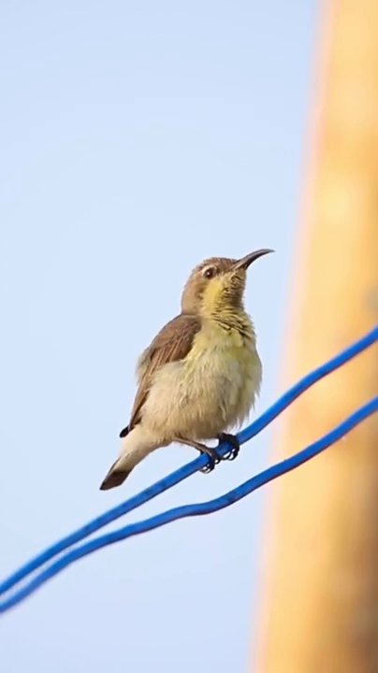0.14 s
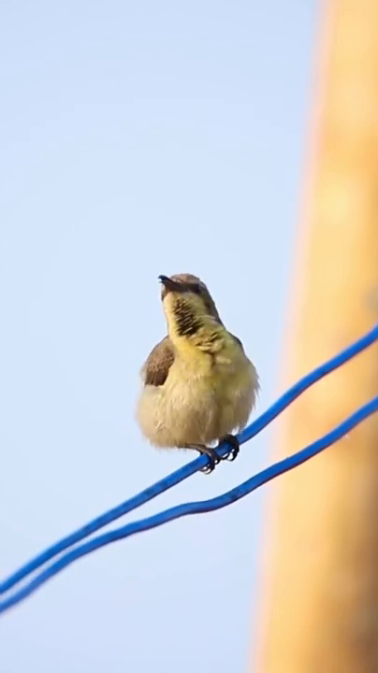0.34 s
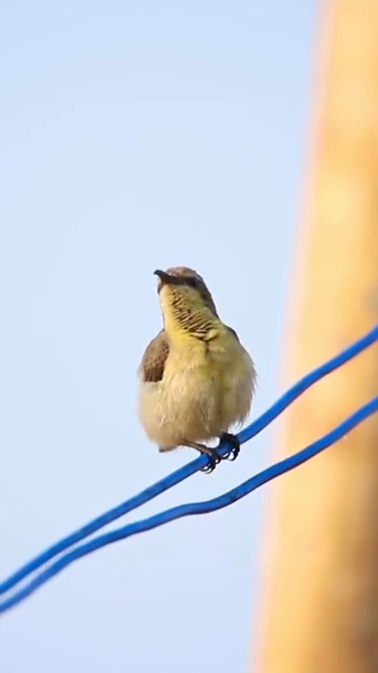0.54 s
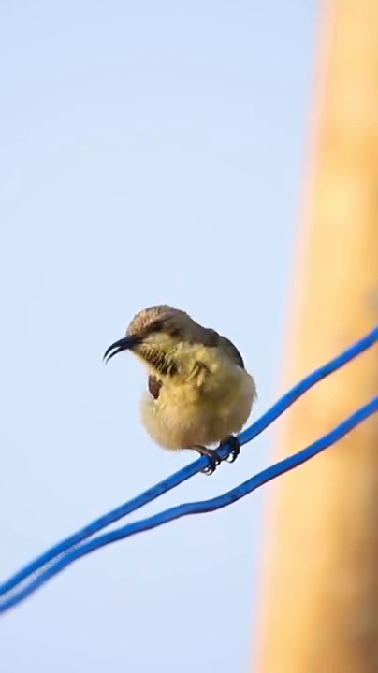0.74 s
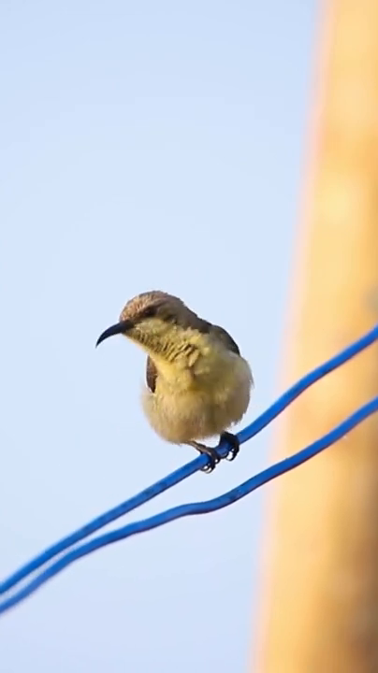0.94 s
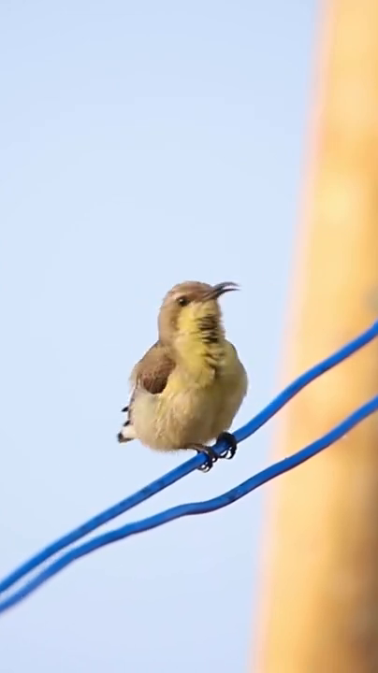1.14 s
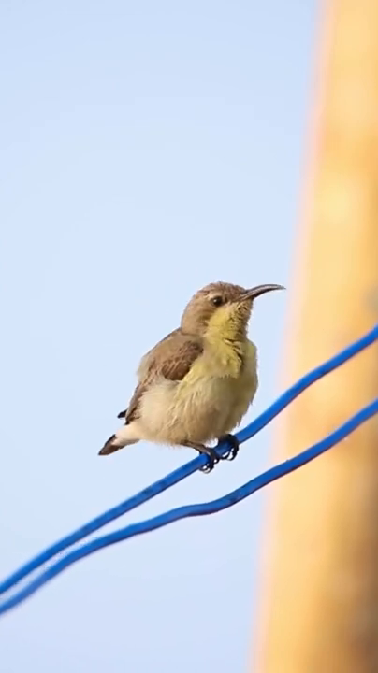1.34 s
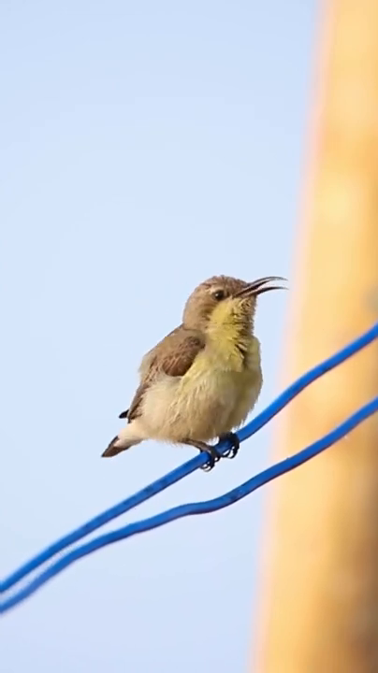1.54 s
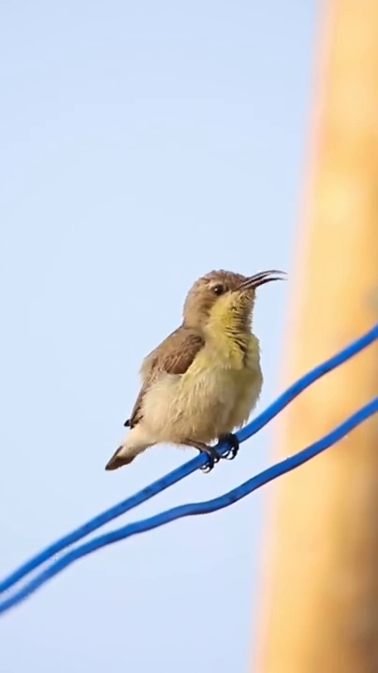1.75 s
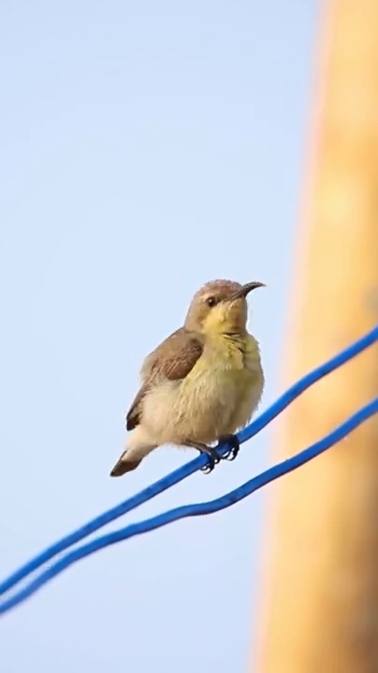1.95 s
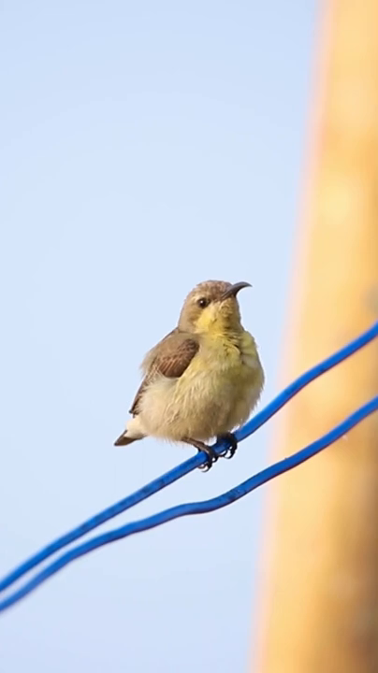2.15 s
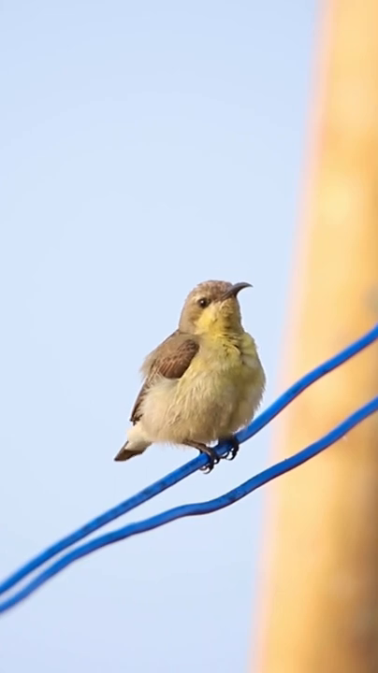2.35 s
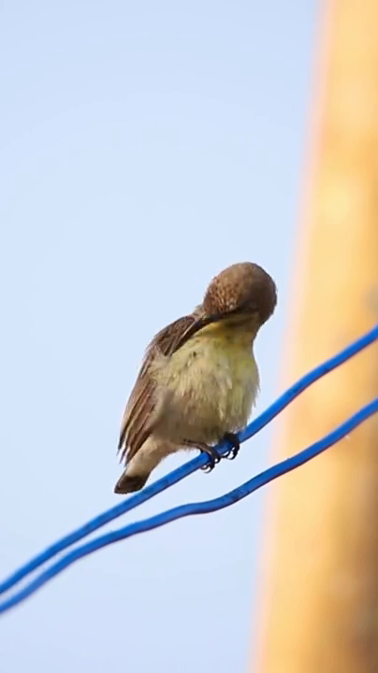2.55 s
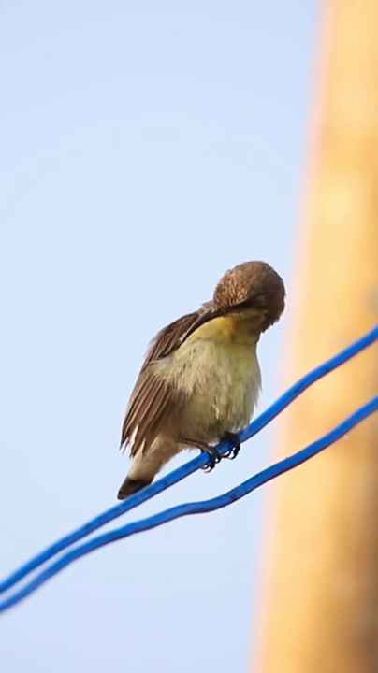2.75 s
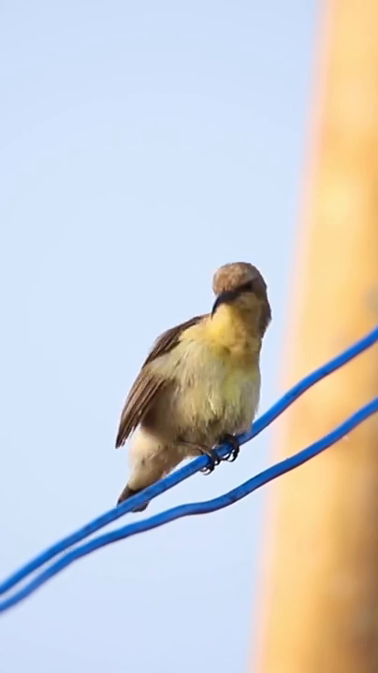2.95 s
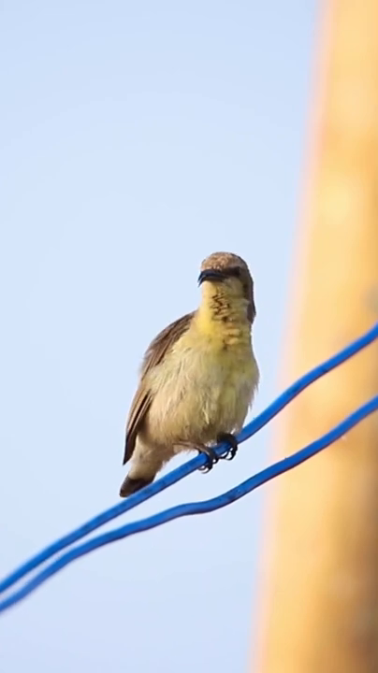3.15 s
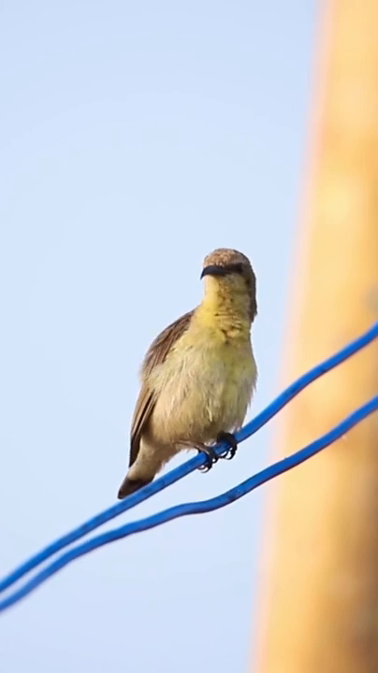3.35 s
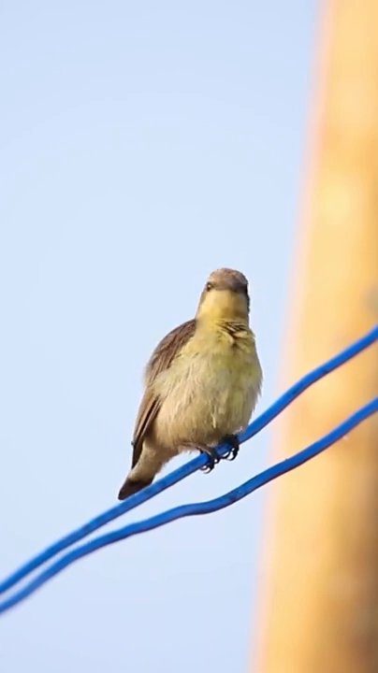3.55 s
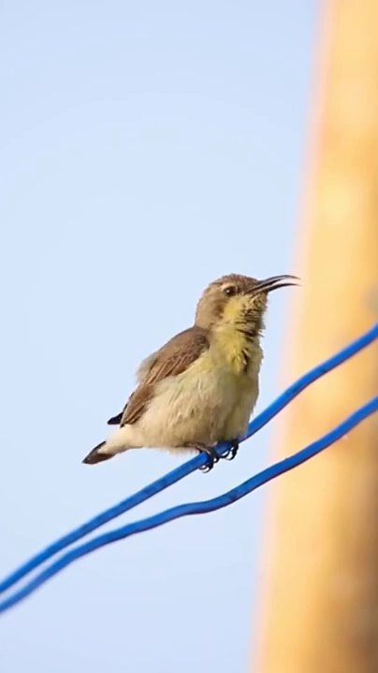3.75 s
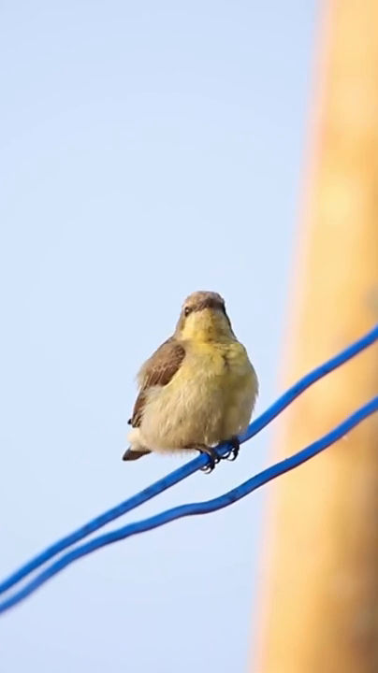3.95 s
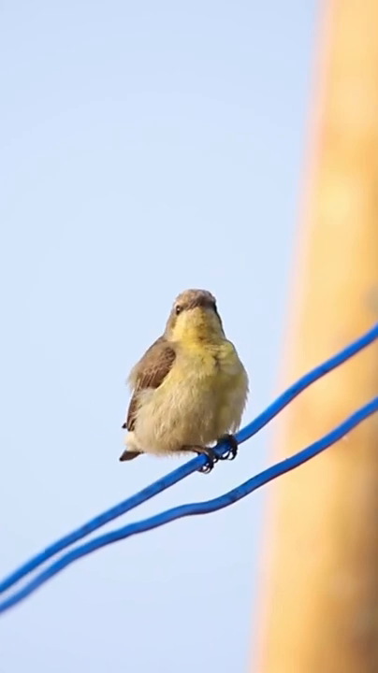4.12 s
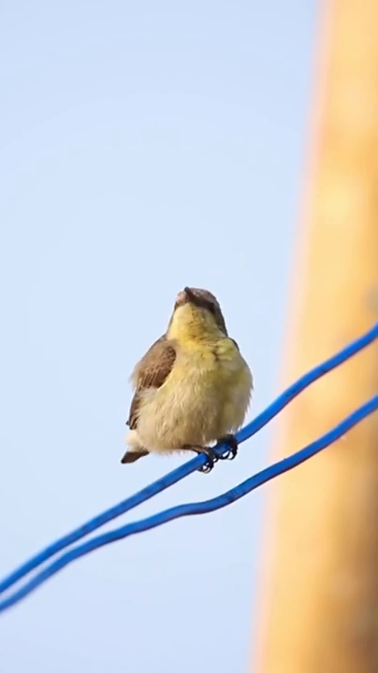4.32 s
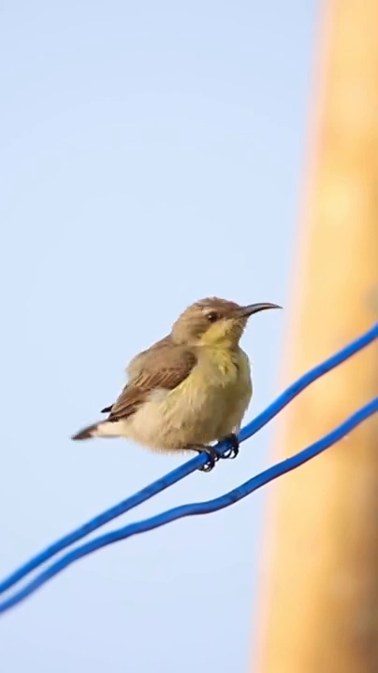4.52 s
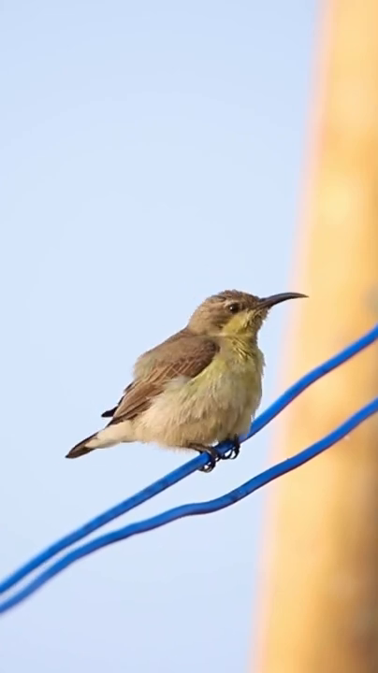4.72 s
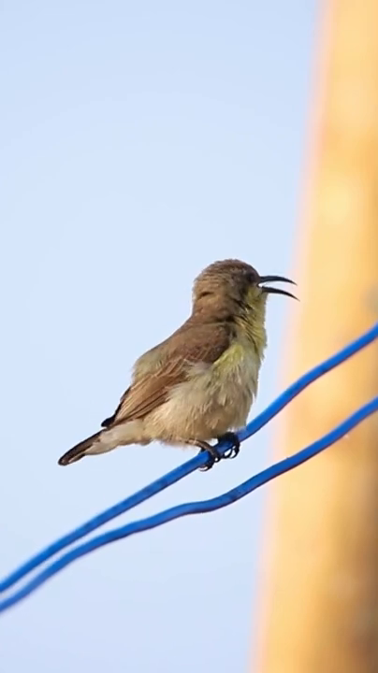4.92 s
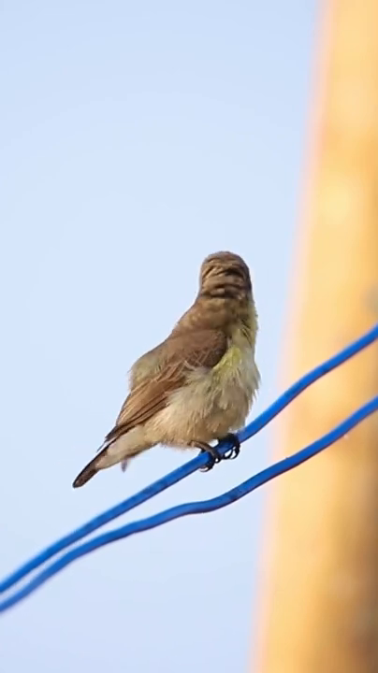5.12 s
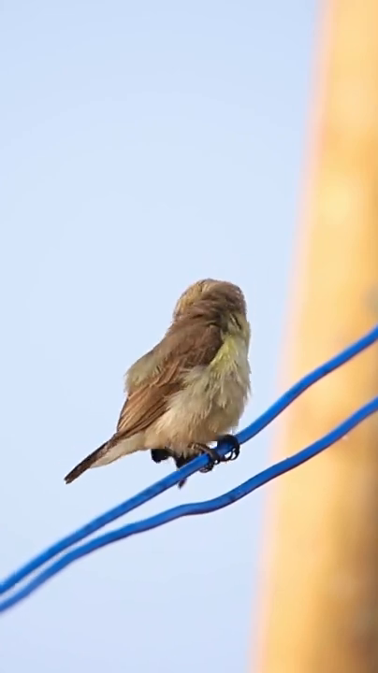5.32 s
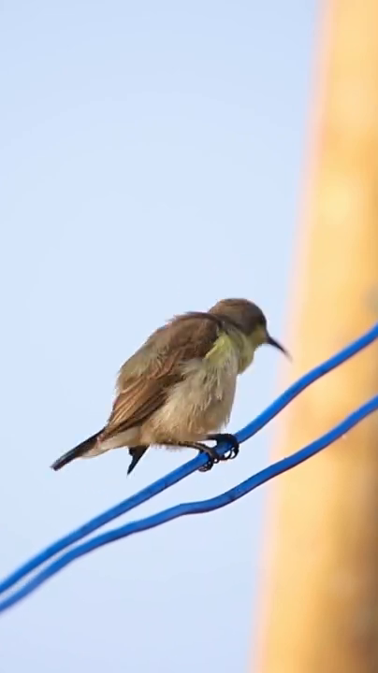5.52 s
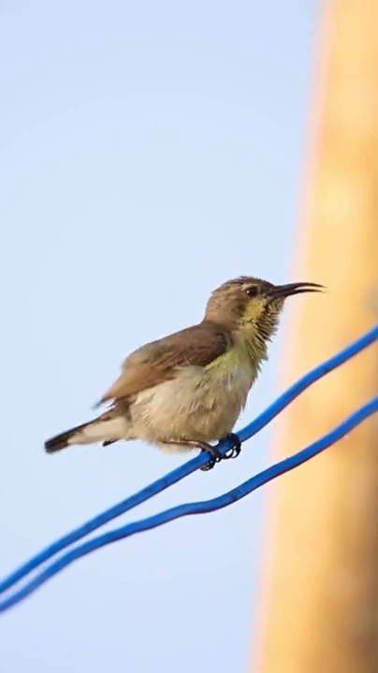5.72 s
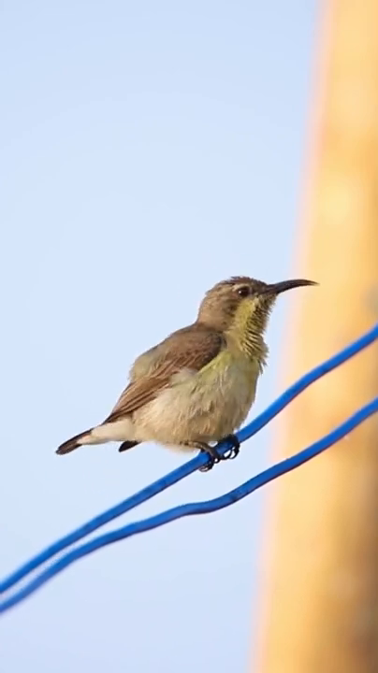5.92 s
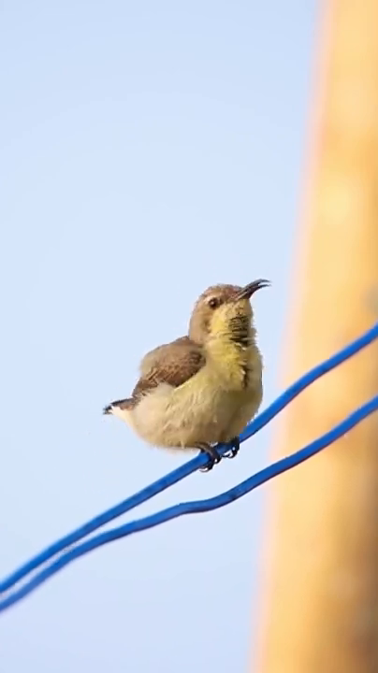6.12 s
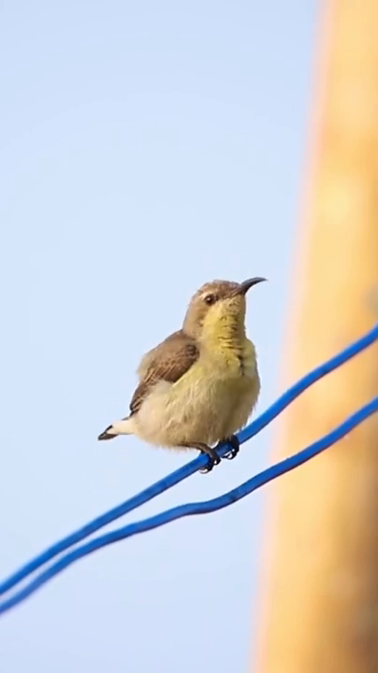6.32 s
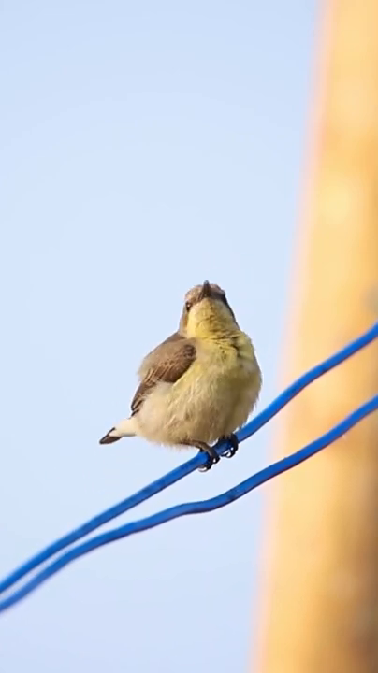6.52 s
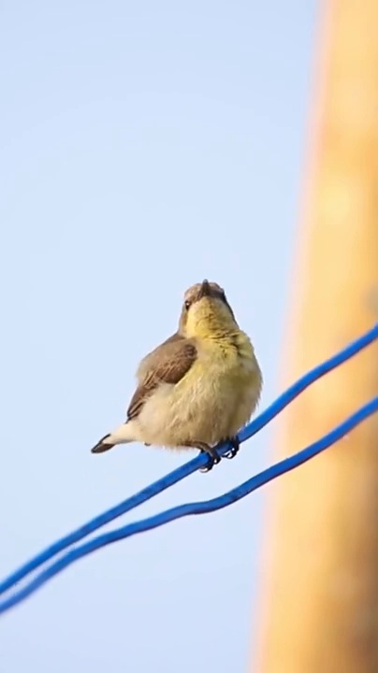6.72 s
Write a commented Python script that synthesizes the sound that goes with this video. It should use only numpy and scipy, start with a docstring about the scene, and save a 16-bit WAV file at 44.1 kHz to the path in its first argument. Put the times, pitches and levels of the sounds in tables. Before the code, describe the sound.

A small sunbird repeats sharp, rising chirps close by, each a tiny buzz flicking up to a piercing whistle, over faint distant birds and town hush.

```python
"""The rising end of a sunbird's chirp is heard first; more chirps follow, each a short buzz, then an upward whistle.
One voice with overtones, shaped by the throat, makes them; a nearby wall and the neighbourhood add short echoes.
Gliding sines make far birds, cooing doves and other low tones; shaped noise and a hum make the town.
A camera's own electronics whine, louder on the left: a sine that changes pitch with every frame."""
import sys
import numpy as np
from scipy import signal
from scipy.fft import rfft, irfft, next_fast_len
from scipy.io import wavfile
from scipy.ndimage import uniform_filter1d, map_coordinates

SR = 44100
rng = np.random.default_rng(int(sys.argv[2]) if len(sys.argv) > 2 else 0)


def materialize(psi):
    """Save the field psi as 16-bit PCM at rate SR to the path in sys.argv[1].

    A 1-D psi becomes a single channel; in a 2-D psi each row is a channel.
    """
    bounded = np.clip(np.atleast_2d(psi).T, -1, 1)
    quanta = np.round(bounded * 32767).astype(np.int16)
    wavfile.write(sys.argv[1], SR, quanta)


N = 298557  # samples

# Chirps of the sunbird. Each row: start of the whistle in seconds, buzz before it in seconds, sweep in seconds,
# hold at the top in seconds, buzz pitch in Hz, knee pitch in Hz, start of the last flick as a share of the sweep,
# pitch there in Hz, top pitch in Hz, level offset in dB, extra level of the buzz in dB, level change at the end in dB.
CHIRPS = [ (-.115, 0.032, 0.15066, 0.00125, 1500, 4150, .75, 4410, 5372, -1.5, 0, -10.5),
          (.354, 0.0317, 0.1553, 0.00106, 1451, 4199, 0.785, 4544, 5637, 0.5, 1, -12),
          (.746, 0.0343, 0.14285, 0.00283, 1500, 4269, 0.822, 4861, 5645, -1, 2.4, -3.5),
          (1.133, 0.0345, 0.1558, 0.0151, 1500, 4306, 0.735, 4838, 5723, -.5, 2.27, -5),
          (1.612, .034, 0.16005, 0.0012, 1483, 4259, 0.774, 4710, 5565, -0.5, 0.25, -13),
          (3.199, 0.0315, 0.1534, 0.0013, 1508, 4204, 0.7845, 4778, 5648, 1, 0.31, 1),
          (3.711, 0.034, 0.1512, 0.00324, 1496, 4158, 0.84, 4700, 5430, -.5, 1.7, 2.5),
          (4.85, 0.04, 0.1601, 0.00304, 1566, 4140, 0.6845, 4336, 5635, -3, 2.83, -14),
          (5.757, 0.0373, 0.14996, 0.0032, 1522, 4130, 0.752, 4504, 5375, 0, -2.14, -3.5),
          (6.117, 0.0407, 0.1528, 0.0124, 1523, 4328, 0.66, 4653, 5680, 0, 0.053, 7)]
# Resonances of the throat. Each row: frequency in Hz, gain in dB.
THROAT_GAIN = [(700, -36), (1500, -33), (2300, -13), (3200, -3.5), (4600, 5), (5700, -1), (7000, -0.5),
               (8500, -10.5), (11500, -28.5), (16000, -5.5)]
# Overtones before the throat. Each row: pitch in Hz, second and third harmonic in dB relative to the
# fundamental, further change per higher harmonic in dB.
OVERTONES = [(1500, -10, -1.5, -2.5), (1873, 4, -8.5, -31), (2330, -1.5, -28, -28),
             (3200, -15.5, -32.5, -25.5), (3797, -27.5, -9, -30.5), (5740, -10, -39, -23.5)]


def sunbird():
    """Source and filter: one membrane drives the throat; when slack it rasps and alternate cycles differ."""
    track = np.zeros((2, N))
    for s, *row in CHIRPS:
        t, hz, db = gesture(*row)
        slack = np.clip((1950 - hz) / 300, 0, 1)
        jitter = (0.00373 + 0.0219 * slack) * wobble(504.35, size=len(t))
        turns = np.cumsum(hz * (1 + jitter)) / SR

        # Half-integer orders are the lines halfway between the harmonics.
        order = np.arange(1, 25)[:, None] / 2
        second_db, third_db, higher_db = along(OVERTONES, hz)
        upper_db = third_db + higher_db * np.maximum(order - 3, 0)
        source_db = np.where(order <= 1, 0, np.where(order <= 2, second_db, upper_db))
        share = np.where(order % 1 == 0, 1, amp(-5.5) * slack)
        share = share * (order * hz < SR / 2.5)
        drift = np.array([wobble(91, size=len(t)) for _ in order])
        # The lines of the buzz come and go.
        scatter = amp(slack * (rng.normal(0, 1.0, order.shape) + 5.16 * drift))
        level = share * scatter * amp(source_db + along(THROAT_GAIN, order * hz))
        lines = level * np.sin(2 * np.pi * (order * turns + rng.random(order.shape)))

        rasp_band = np.hanning(21) * np.cos(np.arange(21) * 2 * np.pi * 4800 / SR)
        rasp = signal.fftconvolve(rng.standard_normal(len(t)), rasp_band, "same")
        voice = lines.sum(axis=0) + amp(-8) * slack * unit(rasp)
        # Onset and release ramps in seconds.
        edges = np.clip(np.minimum((t - t[0]) / 0.0143, (t[-1] - t) / 0.005), 0, 1)
        flutter = amp(2.14 * wobble(298.63, size=len(t)))
        chirp = voice * amp(db) * edges * flutter
        add(track, s + t[0], echoes(chirp, near_db=-2.5, near_t60=0.1045,
                                    far_db=-15.5, far_t60=0.3686, shared=0.519))
    return track * amp([[-.9], [.9]])


# The take-off that all whistles share. Each row: share of the sweep, pitch in Hz.
TAKE_OFF = [(0, 1614), (.085, 2169), (.19, 3171)]
# The voice grows louder with tension. Each row: pitch in Hz, level in dB before the chirp's own offsets.
EFFORT = [(1500, -56), (1630, -49.5), (2150, -45.5), (3200, -38), (4000, -34), (4400, -34), (4750, -31.5),
          (5250, -24.5), (5700, -28)]
KNEE_AT = 0.521  # share of the sweep where the climb slows
ARCH, FLICK_ARCH = 0.56, .54  # share of the rise done halfway to the knee; halfway through the flick
FADE_S = 0.00773  # seconds


def gesture(buzz_s, sweep_s, hold_s, buzz_hz, knee_hz, flick_at, from_hz, top_hz, db, buzz_db, fade_db):
    """Tension sets pitch and level: take-off, arch to a knee, shelf, flick up; the whistle starts at t = 0."""
    t = np.arange(-buzz_s, sweep_s + hold_s, 1 / SR)

    def arch(a, b, share):
        return (a[0] + b[0]) / 2, a[1] + share * (b[1] - a[1])

    knee, flick, top = (KNEE_AT, knee_hz), (flick_at, from_hz), (1, top_hz)
    knots = [(-buzz_s / sweep_s, buzz_hz), *TAKE_OFF, arch(TAKE_OFF[-1], knee, ARCH), knee,
             flick, arch(flick, top, FLICK_ARCH), top]
    hz = np.interp(t / sweep_s, *np.transpose(knots))
    hz = uniform_filter1d(hz, size=110, mode="nearest")  # rounds the corners
    buzz = np.clip(1 - t / FADE_S, 0, 1)
    fade = np.clip(1 - (t[-1] - t) / FADE_S, 0, 1)
    return t, hz, db + along(EFFORT, hz) + buzz_db * buzz + fade_db * fade


# Rising tweets. Each row: start in seconds, length in seconds, level in dB, left minus right in dB.
TWEETS = [(.12, 0.0424, -73, -5.5), (1.4, 0.0433, -63, -15.5), (4.383, 0.0403, -64.5, -3),
          (4.557, 0.026, -70.5, -5.5), (4.988, 0.033, -63.5, -18), (5.149, .032, -69, -13.5)]
# Pitch of every tweet: first, middle and last in Hz.
TWEET_HZ = (2513, 2869, 3011)
# Pairs of falling notes. Each row: start in seconds, delay of the second note in seconds, level in dB.
PAIRS = [(1.985, .19, -69.5), (4.21, .2, -67.5)]
# The two notes of a pair. Each row: length in seconds, first, middle and last pitch in Hz.
PAIR_NOTES = [(.06, 7358, 6817, 6448), (.083, 6820, 5902, 5866)]
# Single notes. Each row: start in seconds, length in seconds, first, middle and last pitch in Hz,
# level in dB, left minus right in dB.
SINGLE_NOTES = [(0.996, 0.037, 2772, 2660, 2620, -73.5, 0.9), (1.064, 0.063, 2610, 2823, 3140, -66, 9.5),
                (1.242, 0.173, 3200, 2820, 2910, -68.5, 1.5), (6.51, 0.0424, 3152, 3000, 2874, -72.5, -2),
                (6.711, 0.03, 2743, 2760, 2700, -75.5, -4.7)]


def far_birds():
    """Reverberant distance: strong echoes blur the small birds' gliding notes."""
    tweets = [(s, length, *TWEET_HZ, db, pan) for s, length, db, pan in TWEETS]
    pairs = [(s + wait, *note, db, -1)
             for s, gap, db in PAIRS
             for wait, note in zip((0, gap), PAIR_NOTES)]
    return whistles(tweets + pairs + SINGLE_NOTES, waver=.014, near_db=4.5, far_db=-3)


# Coos of doves. Each row: start in seconds, length in seconds, pitch in Hz, level in dB,
# left minus right in dB.
COOS = [(.39, 0.1906, 551.6, -60, 0.5), (1.18, 0.1027, 561, -62, -6.5), (1.93, 0.155, 581.1, -61, 2),
        (2.24, 0.193, 552.3, -65.5, -7.5), (2.48, 0.135, 543.3, -67.5, -7.5), (3.06, 0.119, 570, -64, -4.5),
        (3.63, 0.078, 548.8, -72, -10.5), (3.81, 0.206, 561.4, -65.5, -3.5), (4.38, 0.053, 567.7, -70, -10),
        (4.92, 0.087, 573, -65.5, -5.5)]
# Other low tones. Each row: start in seconds, length in seconds, first, middle and last pitch in Hz,
# level in dB, left minus right in dB.
LOW_TONES = [(0.0, 0.015, 813, 666.6, 564, -44.5, -7.5), (0.04, 0.069, 537.2, 578.4, 583, -58.5, 1.5),
             (0.1, 0.14, 644.2, 639, 577.5, -61.5, 11), (1.08, 1, 825, 809.7, 788.4, -69.5, -0.2)]
COO_DROOP_HZ = 28  # the end of a coo sinks


def doves_and_low_tones():
    """Nearly pure tones: each coo holds its pitch, then sinks; other low tones glide."""
    coos = [(s, length, hz, hz, hz - COO_DROOP_HZ, db, pan) for s, length, hz, db, pan in COOS]
    return whistles(coos + LOW_TONES, waver=.006, near_db=-10, far_db=-14)


def whistles(notes, waver, near_db, far_db):
    """Frequency modulation: a sine glides along a parabola through three pitches, then echoes."""
    track = np.zeros((2, N))
    for s, length, first, middle, last, db, pan in notes:
        u = np.linspace(-1, 1, int(length * SR))
        hz = middle + (last - first) / 2 * u + ((first + last) / 2 - middle) * u ** 2
        hz *= 1 + waver * wobble(154.2, size=len(u))
        level = amp(db + 2.2 * wobble(12.26, size=len(u)))
        edges = np.clip((1 - u ** 2) * 3.37, 0, 1)
        note = level * edges * np.sin(2 * np.pi * np.cumsum(hz) / SR)
        stereo = echoes(note, near_db, 0.103, far_db, 0.42, shared=0.164)
        add(track, s, stereo * amp([[pan / 2], [-pan / 2]]))
    return track


FRAME_HZ = 29.97  # frames per second


def whine():
    """Frequency-shift keying: a thin tone steps up and weakens for a third of every frame."""
    turn = (FRAME_HZ * np.arange(N) / SR + 0.2696) % 1
    raised = uniform_filter1d(1. * (abs(turn - .5) < .17), size=90)
    hz = 10765 + 320 * raised + 45 * (turn - .5)
    hz = hz + 12 * wobble(3.2, size=N) + 20 * wobble(160, size=N)
    level = amp(-59.5 - 8.2 * raised + 0.9 * wobble(60, size=N))
    phase = 2 * np.pi * np.cumsum(hz) / SR
    return level * np.array([np.sin(phase), amp(-12.0) * np.sin(phase + 0.81)])


# Spectrum of the town. Each row: frequency in Hz, relative level in dB per Hz.
TOWN_SPECTRUM = [(18, -37.5), (30, -2.5), (54, -2.5), (142, -5), (195, -3.5), (243, -5), (341, -5.5),
                 (456, -8.5), (541, -2.5), (626, -5), (1040, -8.5), (2380, -13), (10000, -19.5),
                 (13000, -33.5), (22000, -120)]
# Microphone hiss on top. Each row: frequency in Hz, relative level in dB per Hz.
HISS_SPECTRUM = [(9000, -72), (10000, -19.5), (11300, 1), (12000, -5), (14500, -3), (15200, -9),
                 (15700, -28.5)]


def town():
    """Incoherent addition: far traffic, hiss, an unsteady hum, and doves blurred into a wavering band."""
    def dove_band(hz):
        return 1 / (1 + ((hz - 555) / 45) ** 4)

    murmur = rng.standard_normal(N) + 2.4 * rng.standard_normal((2, N))  # common part plus each side's own
    doves = unit(filtered(murmur, dove_band)) * amp(-72.5 + 2.48 * wobble(7, size=N))
    hum_phase = 2 * np.pi * 51 * np.arange(N) / SR + 0.96 * wobble(9.7, size=N)
    hum = amp(-78.5 + 2.4 * wobble(5, size=N)) * np.sin(hum_phase)
    traffic = amp(-58.5) * rush(TOWN_SPECTRUM, patchy_db=1.1425)
    hiss = amp(-77.5) * rush(HISS_SPECTRUM, patchy_db=0.5)
    return hum + traffic + hiss + doves * amp([[-1.5], [1.5]])


# Likeness of the two sides. Each row: frequency in Hz, left-right correlation.
LIKENESS = [(30, 0.595), (80, 0.76), (160, 0.22), (350, 0.047), (600, 0.505), (1200, 0.022), (10000, 0.041)]
# Balance of the two sides. Each row: frequency in Hz, left minus right in dB.
BALANCE = [(30, -0.5), (70, 1), (170, 3.5), (350, 0.74), (700, -4.5), (1400, 1), (4000, 1), (14000, -1.5)]


def rush(spectrum, patchy_db):
    """Partial coherence: mid and side noise, with patches of random gain, set the likeness; rms is 1."""
    z = signal.stft(rng.standard_normal((2, N)), nperseg=512)[2]
    field = uniform_filter1d(rng.standard_normal(z.shape[1:]), 6, 0)
    field = uniform_filter1d(field, 14, 1)
    pair = signal.istft(z * amp(patchy_db * unit(field)), nperseg=512)[1][:, :N]

    def mid_side(hz):
        angle = np.arccos(np.clip(along(LIKENESS, hz), -1, 1)) / 2
        return amp(along(spectrum, hz)) * [np.cos(angle), np.sin(angle)]

    mid, side = filtered(pair, mid_side)
    stereo = np.array([mid + side, mid - side])
    return unit(filtered(stereo, lambda hz: amp(np.outer([.5, -.5], along(BALANCE, hz)))))


def echoes(sound, near_db, near_t60, far_db, far_t60, shared):
    """Exponential decay: fresh noise tails for close surfaces and the neighbourhood, partly alike on both sides."""
    t = np.arange(SR // 2) / SR
    # Axes: near or far, left or right, time.
    tails = rng.standard_normal((2, 2, len(t))) + shared * rng.standard_normal((2, 1, len(t)))
    tails *= amp(2.5 * wobble(200, size=len(t)))  # walls and roofs answer unevenly
    tails *= amp(-60 * t / np.array([near_t60, far_t60])[:, None, None])
    tails *= (amp([near_db, far_db]) / np.linalg.norm(tails[:, 0], axis=1))[:, None, None]
    answer = np.pad(tails.sum(axis=0), ((0, 0), (90, 0)))  # the tails start 90 samples late
    answer[:, 0] = 1  # direct sound
    return signal.fftconvolve(sound[None], answer, axes=1)


def amp(db):
    """Decibels to an amplitude ratio."""
    return 10 ** (np.asarray(db) / 20)


def unit(x):
    """Scales to an rms of 1."""
    return x / np.sqrt(np.mean(x ** 2) + 1e-20)


def along(points, hz):
    """Interpolates the columns of (Hz, value, ..) points on a log frequency axis."""
    f, *cols = np.transpose(points)
    return np.squeeze([np.interp(np.log(hz + 1), np.log(f + 1), c) for c in cols])


def wobble(rate, size):
    """A smooth random curve through rate knots a second."""
    knots = rng.standard_normal(int(N * rate / SR) + 4)
    return map_coordinates(knots, [np.arange(size) * rate / SR])


def filtered(x, response):
    """Linear filtering: multiplies the spectrum by a response of frequency."""
    m = next_fast_len(N + SR // 2)
    return irfft(rfft(x, m) * response(np.fft.rfftfreq(m, 1 / SR)), m)[..., :N]


def add(track, s, sound):
    """Superposition: mixes in a stereo sound at s seconds; what lies before zero is not heard."""
    start = round(s * SR)
    sound = sound[:, max(-start, 0):]
    part = track[:, max(start, 0):][:, :sound.shape[1]]
    part += sound[:, :part.shape[1]]


def scene():
    """Superposition of all sources."""
    return sunbird() + far_birds() + doves_and_low_tones() + town() + whine()


TOP_HZ = 15720


def record(dry):
    """Band limiting: the camera keeps nothing above its top frequency."""
    return filtered(dry, lambda hz: hz < TOP_HZ)


dry = scene()
out = record(dry)
materialize(out)
```